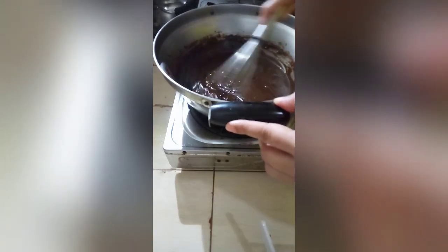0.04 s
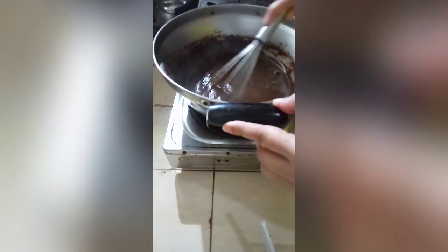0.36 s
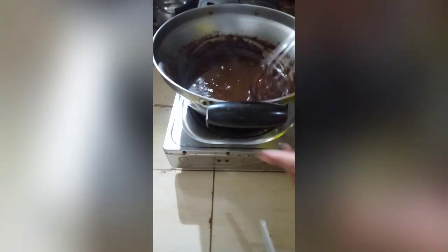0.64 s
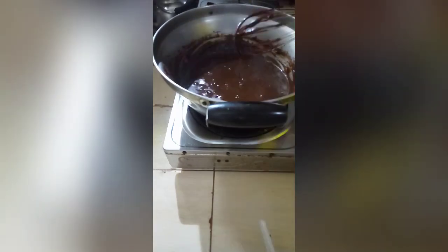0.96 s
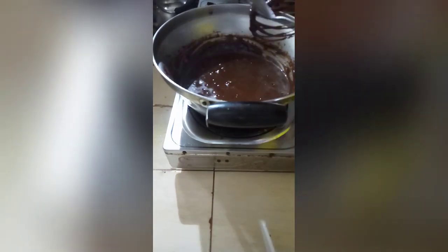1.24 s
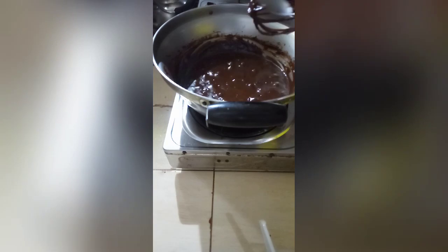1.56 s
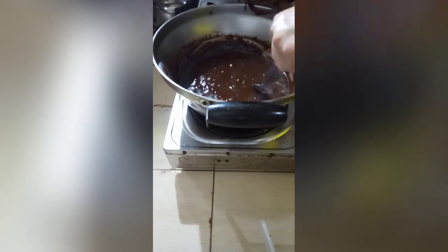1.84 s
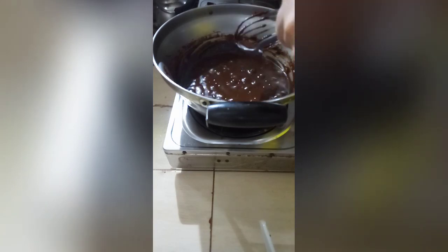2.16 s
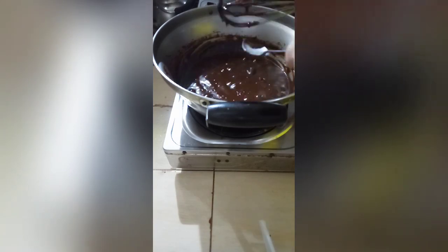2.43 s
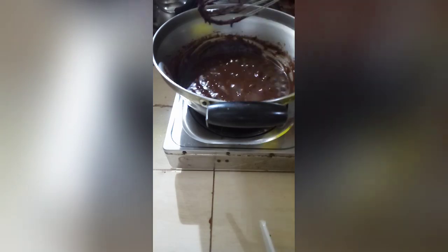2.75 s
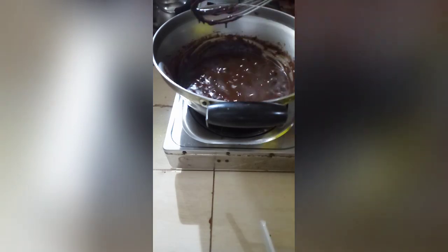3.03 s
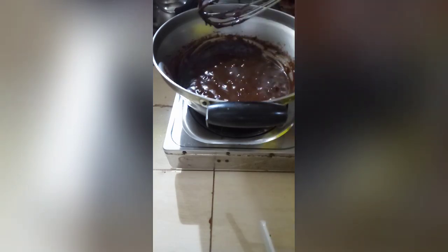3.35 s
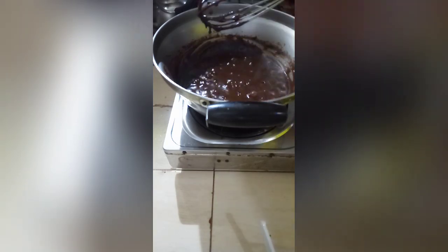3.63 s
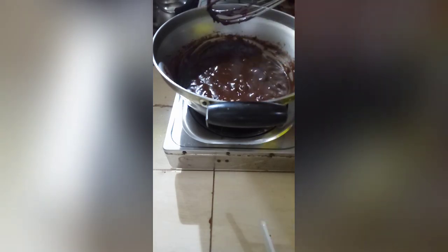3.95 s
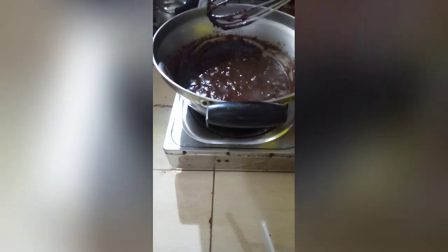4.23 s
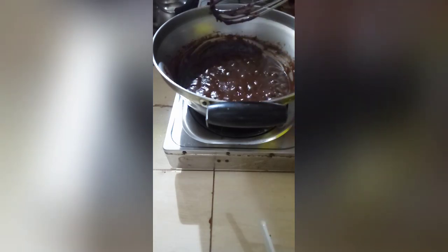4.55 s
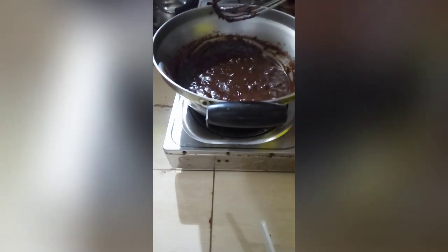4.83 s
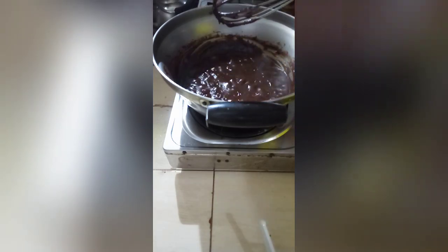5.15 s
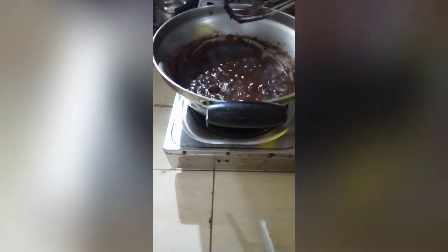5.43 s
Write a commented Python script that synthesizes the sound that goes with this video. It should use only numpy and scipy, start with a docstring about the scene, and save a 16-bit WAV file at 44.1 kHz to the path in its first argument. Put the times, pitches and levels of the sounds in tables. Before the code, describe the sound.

A wire whisk gives thick syrup a quick last stir, squelching, knocking and scraping against a steel wok. It stops within a second, and the syrup keeps boiling in short, irregular gurgles with dull bubble thumps. A bright, frothy sizzle runs throughout, with small puffs of steam and a few sharp spits. A burner rushes faintly underneath, heard close up in a small tiled kitchen.

```python
"""A wire whisk squelches through thick, boiling syrup, knocking and scraping a steel wok in a last stir.
The syrup goes on gurgling in short surges as vapour bubbles thump the ringing bottom of the pan.
Above it, tiny bursting bubbles froth and sizzle, larger ones vent, and droplets spit on the hot steel.
A burner rushes softly underneath, and a small tiled kitchen adds a short tail."""
import sys
import numpy as np
from scipy import signal
from scipy.fft import rfft, irfft
from scipy.io import wavfile
from scipy.ndimage import uniform_filter1d

SR = 44100
rng = np.random.default_rng(int(sys.argv[2]) if len(sys.argv) > 2 else 0)


def write(x):
    x = np.atleast_2d(x).T
    wavfile.write(sys.argv[1], SR, np.round(np.clip(x, -1, 1) * 32767).astype(np.int16))


N = 250929
TIME = np.arange(N) / SR

# Modes of the wok's syrup-covered bottom and bare wall. Each row: pitch in Hz, level in dB, t60 in seconds.
BOTTOM_MODES = [(313.2, -5.5, 0.065), (384.5, -13, 0.11), (489.3, -10.5, 0.13), (570.6, 1, 0.12),
                (646.7, 2.5, 0.099), (680, -5.5, 0.099), (787, -15, 0.28), (821.5, -11, 0.23),
                (910, -18, 0.2)]
WALL_MODES = [(312, 1, .11), (330, 3, .2), (391, -8, .3), (525, 0, .13), (572, 3, .43), (612, 0, .12),
              (758, -5, .2), (780, -3, .27), (826, -3, .32), (889, -7, .18), (942, -12, .28),
              (1435, -14, .3), (1495, -9, .3), (1540, -11, .35), (1623, -15, .25), (1768, -10, .2),
              (1793, -17, .5), (1938, -19, .4), (2425, -21, .3), (2975, -19, .3), (3050, -19, .2),
              (3538, -25, .45), (3945, -26, .5)]
# Surges of the boil. Each row: start and length in seconds, lower and upper ring in dB, upper pitch in Hz.
BOIL_SURGES = [(0.704, 0.03, -38.5, -39, 648), (0.736, 0.11, -44.5, -51, 645),
               (0.881, 0.031, -48, -65, 645), (0.927, 0.1, -42, -43, 655), (1.12, 0.031, -43, -50, 652),
               (1.21, 0.029, -31.5, -35.5, 690), (1.253, 0.029, -50, -46, 697), (1.3, 0.059, -53, -45, 667),
               (1.384, 0.079, -57, -43.5, 680), (1.492, 0.12, -47.5, -43, 670),
               (1.672, 0.027, -44, -45, 646), (1.704, 0.11, -39.5, -38, 665), (1.823, 0.1, -40.5, -41, 669),
               (1.923, 0.063, -46.5, -43.5, 658), (2.036, 0.054, -44.5, -40.5, 661),
               (2.107, 0.14, -47, -43, 675), (2.276, 0.036, -56, -41, 671), (2.302, 0.036, -35.5, -48, 636),
               (2.385, 0.015, -58, -50, 650), (2.43, 0.082, -41.5, -42.5, 667),
               (2.617, 0.017, -57, -37.5, 655), (2.676, 0.031, -55, -36, 656),
               (2.767, 0.018, -46, -45, 667), (2.812, 0.097, -47.5, -47, 675),
               (2.9, 0.082, -38.5, -42, 658), (3.003, 0.066, -49, -42.5, 661),
               (3.118, 0.067, -55, -43, 676), (3.243, 0.071, -49, -41, 664),
               (3.327, 0.015, -56, -39.5, 648), (3.398, 0.046, -40.5, -39.5, 656),
               (3.474, 0.0081, -59, -42.5, 666), (3.545, 0.015, -48, -42.5, 653),
               (3.586, 0.094, -46, -38.5, 666.5), (3.705, 0.024, -58, -47, 666),
               (3.775, 0.095, -44, -42, 675), (3.903, 0.033, -59, -44.5, 675), (3.961, 0.1, -45, -40, 674),
               (4.088, .018, -44, -51, 650), (4.143, 0.053, -42.5, -39, 650), (4.2, 0.066, -68, -40.5, 671),
               (4.264, 0.063, -44, -51.5, 684), (4.355, 0.079, -38.5, -39.5, 661),
               (4.446, 0.23, -43.5, -42.5, 665), (4.655, 0.064, -35, -35, 658),
               (4.753, 0.062, -39.5, -40, 674), (4.875, 0.048, -60, -46.5, 647),
               (4.924, 0.084, -44.5, -42, 667), (5.04, 0.024, -32, -40, 667),
               (5.102, 0.083, -44, -37, 663.5), (5.243, 0.085, -41, -41, 668),
               (5.388, 0.04, -34.5, -43, 668), (5.506, 0.17, -51, -47.5, 655)]
# The steady bed of steam. Each row: time in seconds, froth level in dB, sizzle level in dB.
STEAM_LEVELS = [(0, -46.5, -36.5), (.6, -46, -39), (.69, -51, -40.5), (0.821, -50.5, -37.5),
                (1.5, -48.5, -39.5), (1.7, -47.5, -37.5), (2.05, -50.5, -39), (2.3, -48, -38.2),
                (3.0, -48, -38), (3.55, -48, -38.5), (4.8, -48.5, -38), (5.69, -47, -38.5)]
# Puffs of steam. Each row: centre in seconds, froth level in dB, sizzle level in dB, length in seconds.
STEAM_PUFFS = [(0.712, -42.5, -54, 0.043), (0.876, -47, -48, 0.045), (1.115, -46, -40, 0.078),
               (1.245, -65, -42, 0.032), (1.335, -47, -52, 0.09), (1.755, -46, -41, 0.075),
               (1.962, -50, -33.5, 0.026), (2.647, -48, -47, 0.05), (2.927, -50, -38, 0.056),
               (3.135, -46, -44, 0.075), (3.27, -49, -36, 0.048), (3.4, -47, -44, 0.041),
               (3.946, -43.5, -39, 0.069), (4.09, -55, -36, 0.041), (4.385, -46, -43.5, 0.14),
               (4.625, -46, -50, 0.037), (4.716, -49, -57, 0.07), (4.755, -52, -37.5, 0.022),
               (4.81, -45.5, -41, 0.054), (4.986, -47, -45, 0.11), (5.249, -64, -33.5, 0.043),
               (5.438, -50, -37, 0.056)]


def gain_of(db):
    return 10 ** (np.asarray(db) / 20)


def unit_rms(x):
    return x / np.sqrt(np.mean(x ** 2) + 1e-20)


def curve_at(points, hz):
    point_hz, value = np.transpose(points)
    return np.interp(np.log(hz + 1), np.log(point_hz + 1), value)


def add(mix, start_s, sound):
    part = mix[max(round(start_s * SR), 0):][:len(sound)]
    part += sound[:len(part)]


def coloured(x, eq):
    """Shapes x with an EQ curve, at unit level. Each row of eq: frequency in Hz, gain in dB."""
    hz = np.fft.rfftfreq(len(x), 1 / SR)
    return unit_rms(irfft(rfft(x) * gain_of(curve_at(eq, hz)), len(x)))


def ring(x, modes, off_centre=False):
    """Drives decaying modes with x; off centre their signs alternate. Thin steel radiates little bass."""
    t = TIME[:SR]
    response = sum((-1) ** (k * off_centre) * gain_of(db - 60 * t / t60) * np.cos(2 * np.pi * hz * t)
                   for k, (hz, db, t60) in enumerate(modes))
    low_cut = signal.butter(4, 270, "highpass", fs=SR, output="sos")
    return signal.sosfilt(low_cut, signal.oaconvolve(x, response)[:N])


def crackle(per_s, spread_db):
    """Random clicks, many small and a few large."""
    size = gain_of(spread_db * np.minimum(rng.exponential(1, N), 4))
    return unit_rms(size * rng.choice([-1, 1], N) * (rng.random(N) < per_s / SR))


def patchy(x, width_hz, length_s, depth_db=3):
    """Lets separate bands of x swell and fade by chance."""
    bands = signal.stft(x, nperseg=512)[2]
    field = uniform_filter1d(rng.standard_normal(bands.shape), round(width_hz * 512 / SR), axis=0)
    field = uniform_filter1d(field, round(length_s * SR / 256), axis=1)
    return unit_rms(signal.istft(bands * gain_of(depth_db * unit_rms(field)), nperseg=512)[1][:N])


def waver(depth_db, turn_s=0.08):
    """A gain that heads for a new random level every turn_s."""
    knots = np.arange(0, 8, turn_s)
    return gain_of(depth_db * np.interp(TIME, knots, rng.standard_normal(len(knots))))


def blows(rows):
    """One impulse for each row."""
    force = np.zeros(N)
    for start, db in rows:
        add(force, start, gain_of([db]))
    return force


def decay(force, rise_s, t60):
    """The envelope that follows each blow."""
    t = TIME[:SR]
    return signal.oaconvolve(force, (1 - np.exp(-t / rise_s)) * gain_of(-60 * t / t60))[:N]


def swells(rows):
    """A bell-shaped envelope for each row."""
    out = np.zeros(N)
    for centre, db, length in rows:
        t = np.arange(max(centre - 2 * length, 0), centre + 2 * length, 1 / SR)
        add(out, t[0], gain_of(db) * np.exp(-(2 * (t - centre) / length) ** 2))
    return out


def noisy_tone(cycles, width_hz, steady):
    """A resonance kept ringing by chance pushes; steady (0-1) evens out its strength."""
    pole, lead = np.exp(-np.pi * width_hz / SR), SR // 10
    pushes = rng.standard_normal((lead + len(cycles), 2)) @ [1, 1j]
    swing = signal.lfilter([1], np.poly([pole, pole]), pushes)[lead:]
    return unit_rms((swing / abs(swing) ** steady * np.exp(2j * np.pi * cycles)).real)


def cavities(rows):
    """Air rushes through cavities whose resonance glides as they open."""
    out = np.zeros(N)
    for start, db, start_hz, end_hz, half_length, width_share in rows:
        progress = np.linspace(0, 1, round(2 * half_length * SR))
        hz = end_hz + (start_hz - end_hz) * np.exp(-4 * progress)
        shape = (1 - np.exp(-progress / 0.069)) * np.exp(-4.5 * progress) * (1 - progress)
        rush = noisy_tone(np.cumsum(hz) / SR, width_share * start_hz, steady=0.42)
        add(out, start, gain_of(db) * shape / shape.max() * rush)
    return out


def soft_pushes(rows, cycles):
    """A cushioned force for each row, a few cycles of its own pitch long."""
    force = np.zeros(N)
    for centre, db, hz in rows:
        t = np.arange(-cycles / hz / 2, cycles / hz / 2, 1 / SR)
        window = np.hanning(len(t))
        add(force, centre + t[0], gain_of(db) * 2 * window / window.sum() * np.cos(2 * np.pi * hz * t))
    return force


def blups(rows, length_s, rise):
    """Each bubble swells and dies, its pitch creeping up by the share rise as it nears the surface."""
    out, progress = np.zeros(N), np.linspace(0, 1, round(length_s * SR))
    shape = np.sin(np.pi * progress ** 0.71) ** 2
    bent_time = length_s * progress * (1 + rise * (progress - 1) / 2)
    for start, db, hz in rows:
        add(out, start, gain_of(db) * shape * np.sin(2 * np.pi * hz * bent_time))
    return out


def surge_shape(length, attack_s=0.01102, release_s=0.0076, sag_db=0.5):
    """Times and gain of one surge: it wells up fast, sags while it lasts and stops."""
    t = np.arange(-attack_s / 2, length + release_s / 2, 1 / SR)
    gate = np.minimum((t - t[0]) / attack_s, 1) * np.minimum((t[-1] - t) / release_s, 1)
    return t, gate * gain_of(-1 - sag_db * t / length)


def surging():
    """The strength of the boil over all surges."""
    strength = np.zeros(N)
    for start, length, low_db, high_db, _ in BOIL_SURGES:
        t, gate = surge_shape(length)
        add(strength, start + t[0], gate * np.hypot(gain_of(low_db), gain_of(high_db)))
    return strength


def kitchen(x):
    """Sparse reflections from the tiles, each band dying at its own speed."""
    # Reverb time. Each row: frequency in Hz, t60 in seconds.
    decay_times = [(200, 0.11), (1000, 0.17), (3500, 0.33), (6500, 0.13), (15000, 0.093)]
    reflections = rng.choice([-1., 1.], SR) * (rng.random(SR) < 2500 / SR) * (TIME[:SR] > .005)
    hz, t, bands = signal.stft(reflections, SR, nperseg=256)
    fade = gain_of(-60 * t / curve_at(decay_times, hz)[:, None])
    tail = signal.istft(bands * fade, SR, nperseg=256)[1]
    return signal.oaconvolve(x, tail / np.linalg.norm(tail))[:N]


def near_echoes(x):
    """Nearby steel and tiles mirror the middle treble, combing the hiss."""
    # Bounces off the wok, stove and wall. Each row: delay in seconds, gain.
    bounces = [(.00124, .22), (.00202, .1), (.00303, .17), (.00365, .11), (.00565, .07), (.00644, -.07),
               (.00679, .09), (.00893, -.11)]
    treble = signal.sosfilt(signal.butter(1, [900, 8000], "bandpass", fs=SR, output="sos"), x)
    out = np.zeros(N)
    for delay, gain in bounces:
        add(out, delay, gain * treble)
    return out


def burner():
    """The soft, dark rush of the burner."""
    # Its tone. Each row: frequency in Hz, gain in dB.
    burner_eq = [(20, 6), (40, 7.5), (80, 3), (180, 8), (400, 7.5), (900, 8), (2000, -14), (8000, -3)]
    return gain_of(-58.5) * coloured(rng.standard_normal(N), burner_eq)


def sizzle():
    """Tiny bursting bubbles make a bright hiss that swells in puffs."""
    # Its tone. Each row: frequency in Hz, gain in dB.
    sizzle_eq = [(1000, -46), (3000, -33), (4800, -4), (6200, -1.5), (7100, 1), (8000, -0.5), (8900, 2),
                 (10000, -0.5), (12500, -0.5), (15500, -0.5)]
    hiss = patchy(coloured(crackle(per_s=20000, spread_db=3.5), sizzle_eq), width_hz=400, length_s=0.035)
    times, _, levels_db = np.transpose(STEAM_LEVELS)
    bed = gain_of(np.interp(TIME, times, levels_db)) * waver(depth_db=0.57)
    puffs = swells([(centre, db, length) for centre, _, db, length in STEAM_PUFFS])
    return np.hypot(bed, puffs) * hiss


def froth():
    """Froth crackles in the mids, lifts with each puff and surge, and faintly rings the wall."""
    # Tone of the froth and of the wall's shimmer. Each row: frequency in Hz, gain in dB.
    froth_eq = [(700, -27), (1150, -7.5), (1350, -1.5), (1650, 2.5), (2100, 4), (2400, 1.5), (2750, -1.5),
                (3050, 1), (3700, -4.5), (4600, -4), (6500, -13.5), (12000, -35)]
    shimmer_eq = [(950, -37), (1500, -20), (1650, -9), (1800, -3), (1950, -3), (3000, 2.5), (3500, 11),
                  (3900, 13), (6000, 13)]
    foam = patchy(coloured(crackle(per_s=6000, spread_db=3), froth_eq), width_hz=350, length_s=0.046)
    shimmer = gain_of(-9) * coloured(ring(foam, WALL_MODES), shimmer_eq)
    times, levels_db, _ = np.transpose(STEAM_LEVELS)
    bed = gain_of(np.interp(TIME, times, levels_db)) * waver(depth_db=0.1)
    puffs = swells([(centre, db, length) for centre, db, _, length in STEAM_PUFFS])
    lift = np.hypot(puffs, gain_of(-18.5) * surging())
    return np.hypot(bed, lift) * (foam + shimmer)


def vents():
    """Single bubbles let out their vapour with a hiss or a whistle; one row, at 3.371 s, instead adds a thin
    treble tail to the spit there."""
    # Each row: start in seconds, level in dB, start and end pitch in Hz, half-length in seconds,
    # bandwidth as a share of pitch.
    openings = [(.775, -41.5, 1280, 1340, 0.038, 0.043), (1.08, -38.5, 7320, 7220, 0.059, 0.51),
                (1.14, -36.5, 9660, 10170, .054, 0.51), (1.215, -51, 920, 915, 0.066, 0.1),
                (1.31, -48, 830, 827, 0.069, .14), (1.34, -51.5, 1310, 1345, 0.14, 0.055),
                (1.69, -46.5, 5080, 5500, 0.11, 0.14), (1.78, -45, 6860, 7380, 0.35, 0.24),
                (1.865, -47, 926, 930, 0.1, 0.088), (2.055, -47, 1303, 1296, 0.064, .06),
                (2.195, -45, 816, 830, 0.13, 0.082), (2.61, -40, 8460, 8220, 0.19, 0.32),
                (2.9, -43.5, 6190, 6620, 0.3, 0.65), (3.215, -35.5, 9020, 8640, 0.048, 0.25),
                (3.265, -46, 1445, 1270, 0.088, 0.17), (3.358, -41, 3690, 3440, 0.027, 0.18),
                (3.371, -37, 14600, 14400, .025, .12), (3.372, -40, 8900, 8600, 0.06, 0.21),
                (3.415, -41.5, 5930, 5520, 0.063, 0.2), (3.835, -48.5, 910, 930, 0.11, 0.056),
                (3.965, -43.5, 1405, 1360, .05, 0.13), (4.39, -49, 947, 940, 0.069, 0.078),
                (4.46, -49, 2345, 2330, .13, 0.0076), (4.68, -47, 1280, 1320, 0.056, .1),
                (4.927, -43.5, 1590, 1840, 0.069, 0.19), (5.12, -44.5, 1345, 1270, 0.039, 0.11),
                (5.437, -38.5, 1818, 1890, 0.081, 0.34)]
    return cavities(openings)


def spits():
    """Droplets spit on the hot steel, then fizzle away."""
    # Each row: centre in seconds, level in dB, length in seconds.
    droplets = [(1.674, -31.5, 0.011), (2.123, -31.5, 0.01), (2.147, -26, .003), (2.185, -29, 0.0046),
                (3.3693, -17.5, 0.004), (3.885, -23.5, 0.0055), (3.963, -31.5, 0.017),
                (4.135, -30.5, 0.007), (4.8405, -22.5, 0.0058)]
    # Their tone. Each row: frequency in Hz, gain in dB.
    spit_eq = [(60, -10), (400, -5), (1000, -5.5), (2500, -5.5), (5000, -5.5), (9000, -2), (13000, 4),
               (15500, 3)]
    fizzle = decay(blows([(at, db - 10) for at, db, _ in droplets]), rise_s=0.001, t60=0.066)
    return coloured(rng.standard_normal(N), spit_eq) * np.hypot(swells(droplets), fizzle)


def small_bubbles():
    """Small bubbles drum on the bottom with the stir, the simmer and the surges; in surges some sing."""
    # How hard the whisk churns the syrup. Each row: time in seconds, level in dB.
    stir_levels = [(0.03, -63), (0.09, -38.5), (0.19, -53), (0.205, -27.5), (0.23, -31.5), (0.35, -36),
                   (0.43, -55), (0.47, -38), (0.55, -49), (0.63, -42), (0.675, -64)]
    when, softness, pitch = rng.random((800, 3)).T
    pushes = soft_pushes(zip(when * TIME[-1], -12 * softness, 587 * 2 ** (pitch - .5)), cycles=2.2)
    drumming = unit_rms(ring(pushes, BOTTOM_MODES))
    when, softness, pitch = rng.random((900, 3)).T
    levels_db = -12 * softness - 14 * abs(pitch - .5)
    hz = 570 * 2 ** (1.8 * (pitch - .5))
    singing = unit_rms(blups(zip(when * TIME[-1], levels_db, hz), length_s=0.023, rise=0.034))
    stir = gain_of(np.interp(TIME, *np.transpose(stir_levels), right=-np.inf))
    simmer = gain_of(-61) * waver(depth_db=4)
    surge = surging()
    return (stir + simmer + gain_of(-10.5) * surge) * drumming + gain_of(-16.5) * surge * singing


def big_bubbles():
    """Big bubbles thump the bottom, while slow ones ring at their own pitch."""
    # Each row: time in seconds, level in dB, bubble pitch in Hz.
    thumping = [(.7065, -30.5, 584), (1.2095, -28.5, 560), (1.302, -38, 613), (1.7156, -36, 644),
                (1.7935, -38, 560), (3.664, -37.5, 530), (3.9635, -34.5, 643), (4.374, -33.5, 540),
                (4.566, -40.5, 596), (4.6555, -29, 570), (5.1115, -36, 626)]
    slow = [(.122, -36, 621), (.72, -43, 396), (.77, -46, 401), (1.125, -47, 429), (4.98, -43, 483),
            (5.535, -52, 503)]
    thumps = gain_of(0.5) * ring(soft_pushes(thumping, cycles=3.02), BOTTOM_MODES)
    return thumps + blups(slow, length_s=0.045, rise=0.084)


def gurgles():
    """Each surge keeps two pan resonances fluttering; the upper one creeps up as the syrup lifts."""
    low_hz, width_hz, steady = 566.3, 31.4, 0.67
    rise, wobble = 0.016, 0.0083  # shares of the upper pitch
    flutter_db, knots = 4, np.arange(64) * 0.009
    out = np.zeros(N)
    for start, length, low_db, high_db, high_hz in BOIL_SURGES:
        t, gate = surge_shape(length)
        flutter, wander = (np.interp(t, knots, row) for row in rng.standard_normal((2, len(knots))))
        glide_hz = high_hz * (1 + rise * (t / length - .5) + wobble * wander)
        low = gain_of(low_db - 2) * noisy_tone(low_hz * t, width_hz, steady)
        high = gain_of(high_db - 0.8) * noisy_tone(np.cumsum(glide_hz) / SR, width_hz, steady)
        add(out, start + t[0], gate * unit_rms(gain_of(flutter_db * flutter)) * (low + high))
    return out


def boil():
    """Vapour bubbles sound dully through the thick syrup and make it gurgle."""
    muffle = signal.butter(8, 980, fs=SR, output="sos")
    return signal.sosfilt(muffle, small_bubbles() + big_bubbles()) + gurgles()


def whisk_knocks():
    """The whisk hits the wok with a thud, ringing its wall and bottom."""
    # Each row: time in seconds, force on the wall in dB, force on the bottom in dB.
    hits = [(.2152, -27.5, -38), (0.2189, -21, -21.5), (.2298, -28, -36), (.408, -56, -56),
            (.4725, -53, -26), (.584, -54, -52), (.609, -49, -37)]
    force = blows([(at, db) for at, db, _ in hits])
    wall = ring(force, WALL_MODES, off_centre=True)
    bottom = ring(soft_pushes([(at, db, 600) for at, _, db in hits], cycles=2.5), BOTTOM_MODES)
    thud_power = abs(decay(force ** 2, rise_s=0.00045, t60=0.14))
    thud = coloured(rng.standard_normal(N), KNOCK_THUD_EQ) * np.sqrt(thud_power)
    return gain_of(-5.5) * wall + gain_of(-1) * thud + bottom


def whisk_swishes():
    """The loops swish through the film of syrup."""
    # Each row: centre in seconds, level in dB, length in seconds.
    strokes = [(.118, -42, .025), (.17, -27, 0.031), (.198, -34, .022), (.262, -27, 0.018),
               (.5, -30.5, 0.031), (.643, -36, .012)]
    # Their tone. Each row: frequency in Hz, gain in dB.
    swish_eq = [(3000, -27), (6500, -10.5), (10000, -6), (12500, -4), (14500, 2), (16000, -5)]
    return coloured(crackle(per_s=4100, spread_db=0.5), swish_eq) * swells(strokes)


def whisk_wires():
    """Taps and stick-slip scrapes on the hot wall ring the wire loops."""
    # Modes of the loops. Each row: pitch in Hz, level in dB, t60 in seconds.
    wire_modes = [(3200, -4, 0.016), (6750, 10, 0.024), (7150, -1.5, 0.02), (6700, -1, 0.019),
                  (10460, 0, 0.018)]
    # Each row: time in seconds, click level in dB, wire ring level in dB.
    wire_taps = [(0.099, -24.5, -47), (0.172, -36, -35), (0.326, -24, -52), (0.4067, -17.5, -41),
                 (0.419, -37, -33), (.458, -20, -33.5), (0.466, -34, -49), (0.49, -45, -41),
                 (0.504, -46, -42), (0.517, -48, -44), (0.561, -31, -43), (0.582, -19.5, -44),
                 (0.5943, -44, -36), (0.604, -19.5, -37.5), (.612, -37, -28.5), (0.642, -47, -43)]
    # Each row: centre in seconds, level in dB, length in seconds.
    scrapes = [(.104, -38, 0.024), (.174, -35, 0.037), (.252, -26, 0.024), (.326, -30, 0.052),
               (.412, -27.5, 0.036), (.468, -31.5, 0.032), (.505, -40, 0.05), (.541, -29.5, 0.022),
               (.596, -43, 0.055)]
    # Tone of wire on steel. Each row: frequency in Hz, gain in dB.
    contact_eq = [(200, -21), (700, 4.5), (2000, 0), (4000, -4.5), (7000, -6), (9000, -3.5), (12000, -3.5),
                  (15500, 3)]
    slips = coloured(crackle(per_s=10000, spread_db=1.5), contact_eq) * swells(scrapes)
    slips *= unit_rms(waver(depth_db=4.5, turn_s=0.003))
    click_gain = decay(blows([(at, db) for at, db, _ in wire_taps]), rise_s=0.00048, t60=0.038)
    clicks = coloured(rng.standard_normal(N), contact_eq) * click_gain
    wire_force = blows([(at, db) for at, _, db in wire_taps]) + gain_of(-35) * slips
    return slips + clicks + ring(wire_force, wire_modes)


def whisk_squelches(width_share=0.35):
    """Air pockets open behind the whisk, spluttering as films of syrup close and tear."""
    # Each row: start in seconds, level in dB, start and end pitch in Hz, half-length in seconds.
    pockets = [(.044, -33, 6900, 4650, 0.027), (.045, -30.5, 2010, 1427, 0.036),
               (0.056, -30, 1189, 910, 0.039), (0.394, -35, 905, 1100, 0.025),
               (0.406, -30.5, 1244, 961, 0.056), (0.456, -33.5, 1592, 1307, 0.05),
               (0.575, -33, 1846, 1480, 0.022)]
    rush = cavities([(*row, width_share) for row in pockets])
    return rush * unit_rms(waver(depth_db=5, turn_s=0.0025))


def scene():
    """The pan over the soft rush of the burner, heard from one spot."""
    whisk = whisk_knocks() + whisk_swishes() + whisk_wires() + whisk_squelches()
    pan = whisk + boil() + froth() + sizzle() + spits() + vents()
    return np.tile(pan + near_echoes(pan) + gain_of(-10.5) * kitchen(pan) + burner(), (2, 1))


def record(dry):
    """A steep high cut takes off the very top of the hiss."""
    high_cut = signal.firwin(511, 15900, window=("kaiser", 9), fs=SR)
    return signal.oaconvolve(dry, high_cut[None], "same")


# Tone of the whisk's thud. Each row: frequency in Hz, gain in dB.
KNOCK_THUD_EQ = [(100, -19), (230, -24), (330, -2.5), (550, 2), (900, 4), (1150, -4.5), (1600, -1),
                 (2400, -7), (4000, -14.5), (8000, -21), (16000, -44)]

dry = scene()
out = record(dry)
write(out)
```